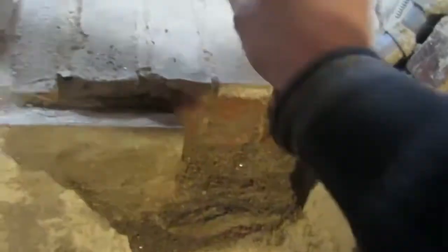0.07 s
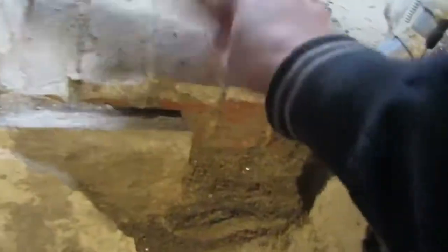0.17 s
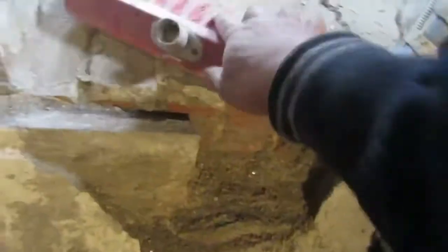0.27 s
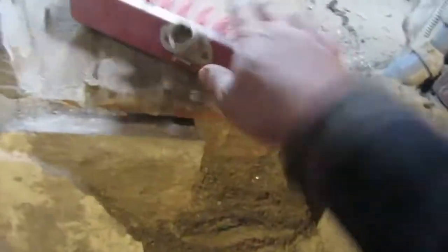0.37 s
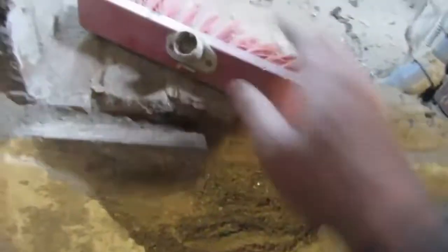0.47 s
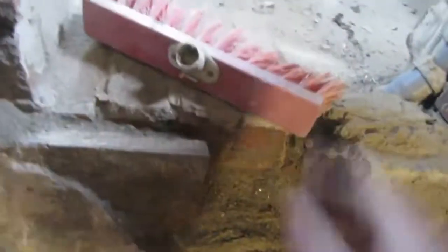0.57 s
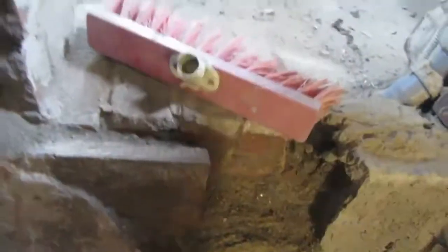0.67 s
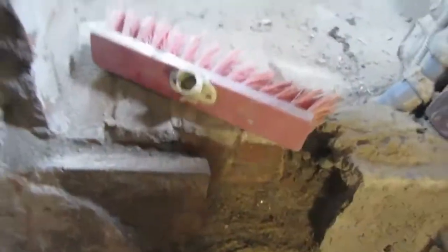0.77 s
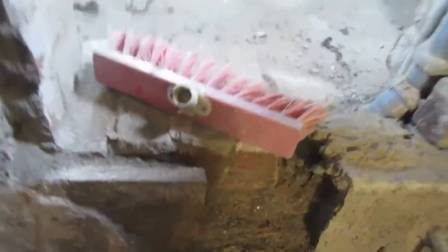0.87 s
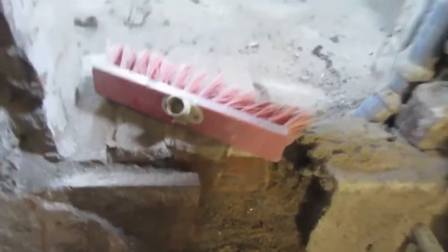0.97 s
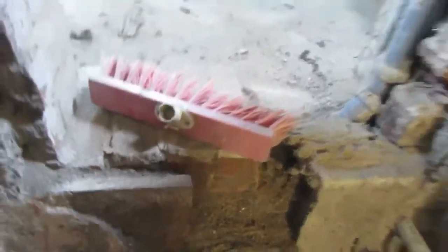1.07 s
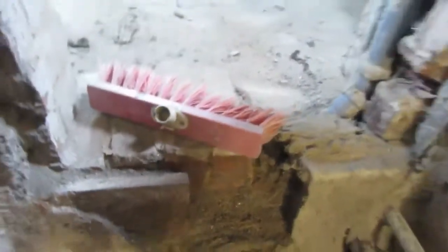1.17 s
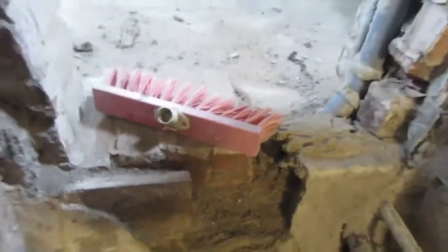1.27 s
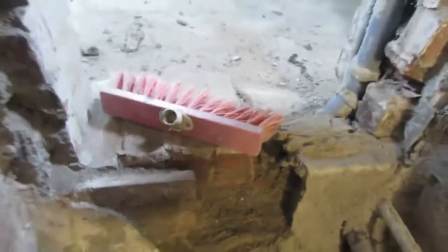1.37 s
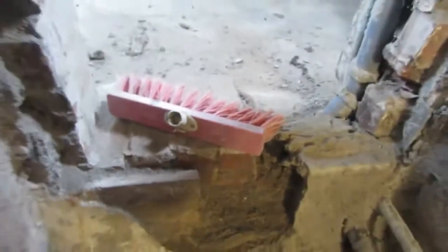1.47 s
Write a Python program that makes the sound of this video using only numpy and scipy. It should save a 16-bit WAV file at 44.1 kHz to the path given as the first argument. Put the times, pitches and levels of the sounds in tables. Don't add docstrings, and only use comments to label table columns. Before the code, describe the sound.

A brush block knocks onto stone. From 0 to 0.25 s stiff bristles scrape rough masonry, hissing and flicking, brightening at the end. At 0.25 s a sharp, distorted clack hits, with short cellar echo; a weaker bounce follows at 0.31 s, then faint taps, grit ticks and trickling dust until 0.5 s. Quiet room air slowly rises, with soft low thuds near 0.7-0.9, 1.2 and 1.48 s, and a faint gritty touch at the end.

```python
import sys
import numpy as np
from scipy import signal
from scipy.fft import rfft, irfft
from scipy.io import wavfile
from scipy.ndimage import uniform_filter1d

SR = 44100
rng = np.random.default_rng(int(sys.argv[2]) if len(sys.argv) > 2 else 0)


def log_audio(samples):
    frames = np.atleast_2d(samples).T
    limited = np.clip(frames, -1, 1)
    pcm = np.round(limited * 32767).astype(np.int16)
    wavfile.write(sys.argv[1], SR, pcm)


def level_to_linear(level):
    exponent = np.asarray(level, float) / 20
    return 10 ** exponent


N = 66150
T = np.arange(N) / SR

# f/Hz, level per Hz/dB
AIR_COLOUR = [(25, -7.5), (90, -6), (160, -3.5), (320, -6), (1300, -7.5), (2600, -15.5), (8000, -24),
              (15000, -36)]
# t/s, level/dB
RUMBLE = [(0, -43), (.05, -63), (.2, -61.5), (.3, -66), (.45, -74)]
# t/s, peak level/dB, f/Hz
THUDS = [
    (0.057, -49, 159.8),
    (0.723, -50.5, 152.7),
    (0.796, -47.5, 151),
    (0.867, -54, 158),
    (0.933, -65, 151),
    (1.215, -42, 150.4),
    (1.279, -46.5, 148.8),
    (1.483, -41.5, 74.2),
]
# f/Hz, level/dB, t60/s
CELLAR = [(120, -55, .45), (154, -45.5, 0.67), (222, -34, 0.15), (350, -29, .42), (520, -32, .33),
          (758, -42.5, 0.46), (1200, -32.5, 0.23), (1800, -32, 0.21), (2510.5, -39, 0.17),
          (4200, -43.5, 0.16), (6500, -42.5, 0.078), (10000, -55.5, 0.27)]
# f/Hz, level per Hz/dB
DUST_COLOUR = [(500, -20), (1500, -4), (4000, -0.5), (9000, -4), (15000, -15)]
# t/s, level/dB, f/Hz, t60/s
CHIPS = [
    (0.3166, -33, 5580, 0.0083),
    (0.38, -48, 6700, .015),
    (0.422, -52.5, 4200, .02),
    (.432, -54, 5600, 0.013),
    (0.446, -59, 9220, .01),
    (0.498, -62, 7490, .015),
    (.94, -56.5, 8430, .015),
]
# t/s, level/dB
DRAG = [(0, -43), (.08, -45.5), (.135, -42), (.15, -45.5), (.192, -40), (.21, -41.5), (.226, -34.5),
        (.231, -27.5), (.248, -25.5), (.253, -59.5)]
# t/s, level/dB
TOUCH = [(1.478, -90.5), (1.484, -55), (1.5, -48.5)]
# f/Hz, level per Hz/dB
DRAG_COLOUR = [(180, -53), (300, -25), (1290, -8), (1910, -7), (2070, -8), (3020, -1.5), (3860, -8),
               (9180, -7.5), (15000, -24.5)]
# f/Hz, level per Hz/dB
GRIT_COLOUR = [(35, -38), (60, -6), (155, -9), (276, -17.5), (317, -11.5), (469, -7), (3050, -4),
               (5820, -10), (15000, -24)]
# t/s, peak level/dB, f/Hz, ring t60/s
FLICKS = [(0.024, -34.5, 2800, .02), (0.0278, -28.5, 5000, 0.011), (0.041, -27, 4600, 0.023),
          (.056, -29.5, 3600, 0.061), (0.073, -37, 6000, .02), (0.0874, -31.5, 3530, 0.09),
          (0.093, -23, 4500, 0.0052), (0.0928, -26, 3000, 0.075), (0.1096, -29, 4500, .05),
          (.1245, -21.5, 4603, .012), (.146, -35, 7000, 0.01), (0.156, -27.5, 4000, 0.023),
          (0.1661, -21.5, 2500, 0.028), (.172, -26.5, 1600, .04), (0.1798, -29.5, 6000, .02),
          (0.1819, -21, 5000, 0.018), (.1885, -27, 5400, .04), (.1925, -29, 5010, .03),
          (.041, -35.5, 730, .1), (.1125, -31.5, 5000, 0.032), (.175, -35, 900, .05),
          (0.1997, -38.5, 7500, 0.016)]
# f/Hz, level for a flat blow/dB, t60/s, change when it rocks on an edge/dB
BLOCK = [(160.4, -37.5, 0.34, -14), (220.6, -37.5, 0.5, 12), (262.7, -29.5, .25, 10),
         (347, -16.5, 0.052, -2), (372, -42, 0.17, 19), (524, -14, 0.036, 2), (696, -9, 0.017, 7),
         (910, -18.5, .03, 9.5), (1274, -10, 0.029, 1.5), (1556.7, -6, .014, -1.5),
         (2150, -7.5, 0.0099, -11), (2928, -5.5, 0.0082, 1), (4250, -14.5, .007, -26),
         (6700, -13.5, .006, -5)]
# t/s, strength/dB, contact time/ms
KNOCKS = [
    (0.2497, 8.5, 0.043),
    (.2507, -3, 0.14),
    (0.3146, -9.5, 0.097),
    (0.3202, -17.5, 0.35),
    (.362, -21, 1.4),
    (.386, -24.5, .8),
    (.445, -32, 1.55),
    (.505, -34.5, 1.7),
]
STRIKE_S = KNOCKS[0][0]


def unit(x):
    return x / np.sqrt(np.mean(x ** 2))


def colour(x, table):
    hz, db = np.array(table).T
    f = np.maximum(np.arange(N // 2 + 1) * SR / N, 1)
    gain = level_to_linear(np.interp(np.log(f), np.log(hz), db))
    return unit(irfft(rfft(x) * gain, N))


def band(x, hz, width):
    edges = [hz / (1 + width / 2), min(hz * (1 + width / 2), .45 * SR)]
    return signal.sosfilt(signal.butter(2, edges, "band", fs=SR, output="sos"), x)


def fade(t, t60):
    return (t >= 0) * np.exp(-np.log(1000) * np.maximum(t, 0) / max(t60, 1e-3))


def curve(table):
    s, db = np.array(table).T
    return level_to_linear(np.interp(T, s, db, left=-120, right=-120))


def walk(rate):
    k = int(SR / rate)
    steps = np.repeat(rng.standard_normal(N // k + 1), k)
    smooth = uniform_filter1d(uniform_filter1d(steps, k), k)
    return unit(smooth[:N])


def grains():
    grains_per_s, scatter_db = 18000, 2.5
    happens, sign, size = rng.random((3, N))
    return (happens < grains_per_s / SR) * np.sign(sign - .5) * level_to_linear(-scatter_db * np.log(1 - size))


def gain_control_db():
    open_db, duck_db, creep_db_per_s = 7, -4.5, 2
    recover_s, recover_shape = 0.4, 5.2
    since = T - STRIKE_S
    after = np.maximum(since, 0)
    ducked = duck_db * np.exp(-(after / recover_s) ** recover_shape)
    return np.where(since < 0, open_db, ducked + creep_db_per_s * (after - .8))


def air():
    level_db, swell_db, flicker_db = -57.5, -0.52, 0.87
    noise = rfft(colour(rng.standard_normal(N), AIR_COLOUR))
    swell = walk(1)
    octave = np.log2(np.maximum(np.arange(N // 2 + 1) * SR / N, 1))
    out = 0
    for k in range(4, 16):
        part = irfft(noise * np.clip(1 - np.abs(octave - k), 0, 1), N)
        out = out + part * level_to_linear(swell_db * (swell + walk(1.7)) + flicker_db * walk(25))
    return unit(out) * level_to_linear(level_db + gain_control_db())


def rumble():
    return curve(RUMBLE) * unit(band(rng.standard_normal(N), 90, 1.0))


def thuds():
    t60_s, rise_s = 0.13, 0.0052
    out = 0
    for s, db, hz in THUDS:
        t = np.maximum(T - s, 0)
        envelope = fade(t, t60_s) * (1 - np.exp(-t / rise_s))
        out = out + level_to_linear(db) * np.sin(2 * np.pi * hz * t) * envelope * level_to_linear(2 * walk(57))
    return out


def cellar():
    rise_s = 0.001
    tail = 0
    for hz, db, t60 in CELLAR:
        tail = tail + level_to_linear(db) * unit(band(rng.standard_normal(N), hz, .45)) * fade(T, t60)
    return tail * (1 - np.exp(-T / rise_s))


def dust():
    level_db, t60_s, end_s = -51, .85, .46
    shape = fade(T - STRIKE_S, t60_s) * np.clip((end_s - T) / 0.028, 0, 1)
    return level_to_linear(level_db + 2.5 * walk(79)) * shape * colour(grains(), DUST_COLOUR)


def chips():
    out = 0
    for s, db, hz, t60 in CHIPS:
        t = T - s
        ring = np.sin(2 * np.pi * hz * t) + 0.46 * unit(band(rng.standard_normal(N), hz, 1.2))
        out = out + level_to_linear(db) * ring * fade(t, t60) * np.clip(t / 0.0012, 0, 1)
    return out


def rocking():
    start_s, length_s, level_db, hz = 0.358, 0.06, -41.5, 372.2
    swell = np.sin(np.pi * np.clip((T - start_s) / length_s, 0, 1))
    return level_to_linear(level_db) * np.sin(2 * np.pi * hz * T) * swell


def drag():
    gain = curve(DRAG)
    hard = np.clip(gain / level_to_linear(-36), 0, 1)
    hiss = hard * colour(grains(), DRAG_COLOUR) + (1 - hard) * colour(grains(), GRIT_COLOUR)
    return gain * hiss + curve(TOUCH) * colour(grains(), GRIT_COLOUR)


def flicks():
    snap, width, air_share = 7.5, 1.1, 0.13
    out = 0
    for s, db, hz, ring in FLICKS:
        click = np.arange(N) == int(s * SR)
        shake = unit(grains()) * fade(T - s, ring) + snap * click
        bright = air_share * (hz / 4500) ** 1.9 * band(shake, 9000, .7)
        tick = band(shake, hz, width) + bright
        out = out + level_to_linear(db) * tick / np.abs(tick).max()
    return out


def block(rock):
    out = 0
    for k, (hz, db, t60, edge_db) in enumerate(BLOCK):
        sign = (-1) ** k
        out = out + sign * level_to_linear(db + rock * edge_db) * np.sin(2 * np.pi * hz * T) * fade(T, t60)
    return out


def knocks(room):
    crack_db, crack_hz, crack_t60_s = -8, 9120, 0.0036
    grab_s, grab_db = 0.0012, -5.5
    since = T - STRIKE_S
    out = level_to_linear(KNOCKS[0][1] + crack_db) * np.sin(2 * np.pi * crack_hz * since) * fade(since, crack_t60_s)
    flat, edge = block(0), block(1)
    for k, (s, db, ms) in enumerate(KNOCKS):
        push = np.sin(np.pi * np.clip((T - s) / (max(ms, .05) / 1000), 0, 1))
        body = flat if k < 2 else edge
        out = out + level_to_linear(db) * signal.fftconvolve(push / push.sum(), body + room)[:N]
    out = out * level_to_linear(grab_db * np.clip(since / grab_s - .5, 0, 1) ** 2)
    return signal.sosfilt(signal.butter(2, 180, "high", fs=SR, output="sos"), out)


def scene():
    room = cellar()
    brush = drag() + flicks()
    echo = room / np.sqrt(np.sum(room ** 2))
    wet = level_to_linear(-7.5) * signal.fftconvolve(band(brush, 3500, 7.8), echo)[:N]
    background = air() + rumble() + thuds()
    settling = dust() + chips() + rocking()
    mono = background + settling + brush + wet + knocks(room)
    return np.array([mono, mono])


def band_limit(x):
    return signal.sosfilt(signal.butter(12, 16020, fs=SR, output="sos"), x)


def record(dry):
    x = signal.sosfilt(signal.ellip(8, .2, 50, 15000, fs=SR, output="sos"), dry)
    return band_limit(np.clip(x, -1, 1))


dry = scene()
out = record(dry)
log_audio(out)
```